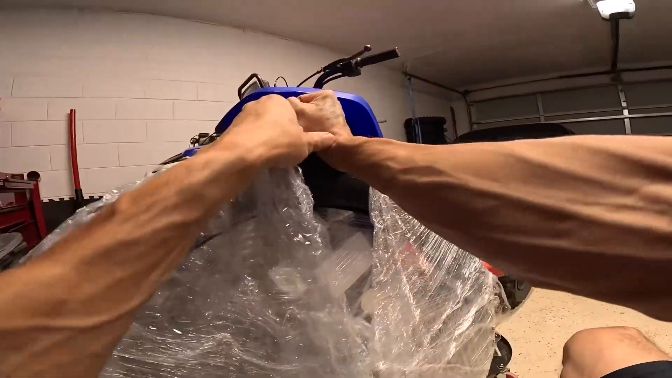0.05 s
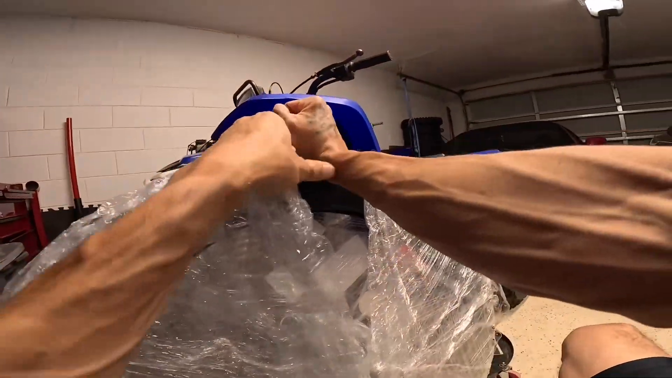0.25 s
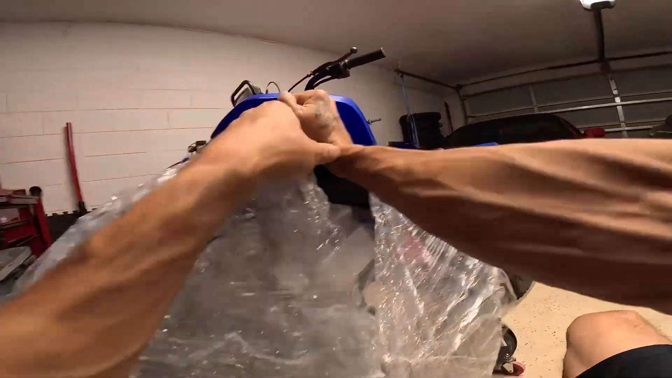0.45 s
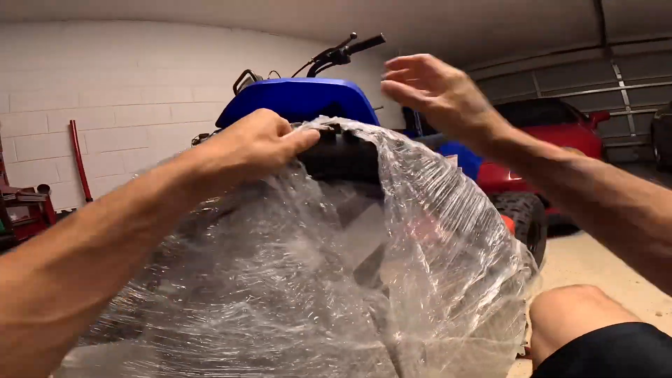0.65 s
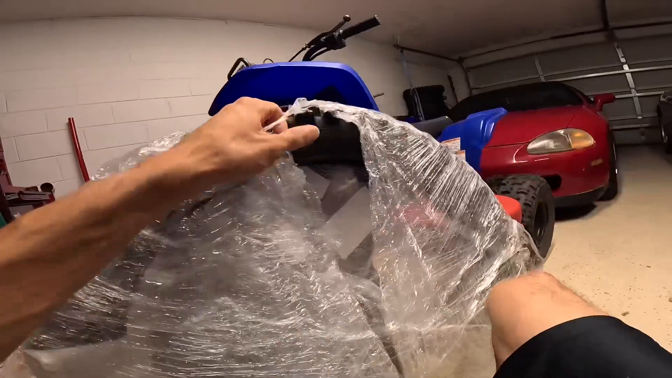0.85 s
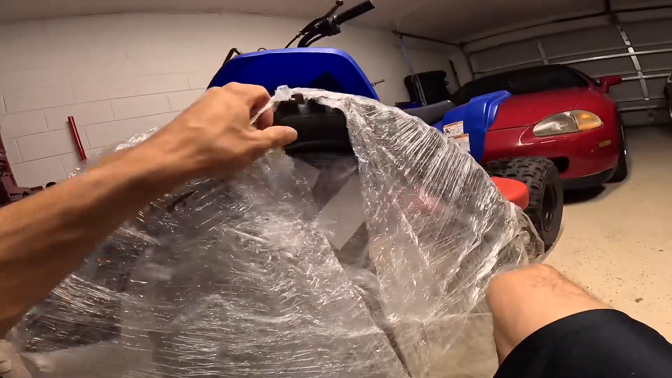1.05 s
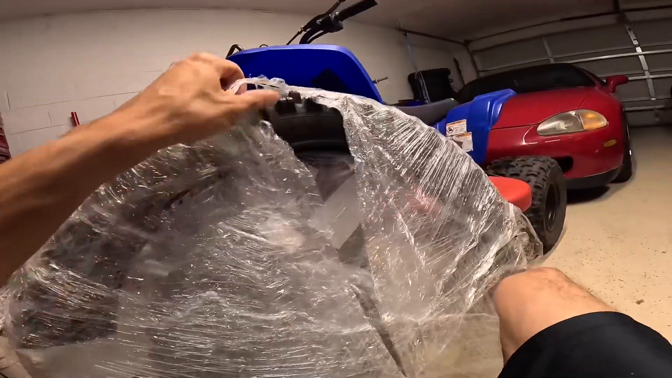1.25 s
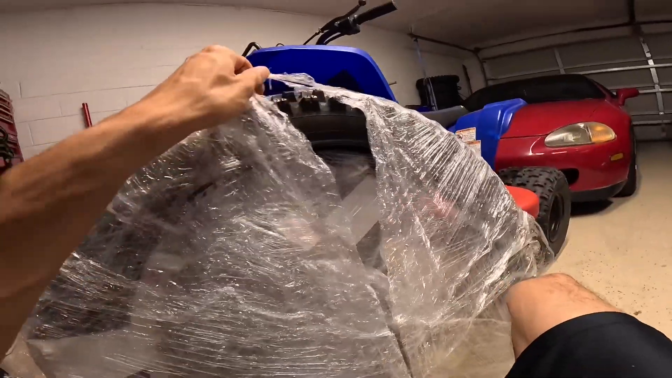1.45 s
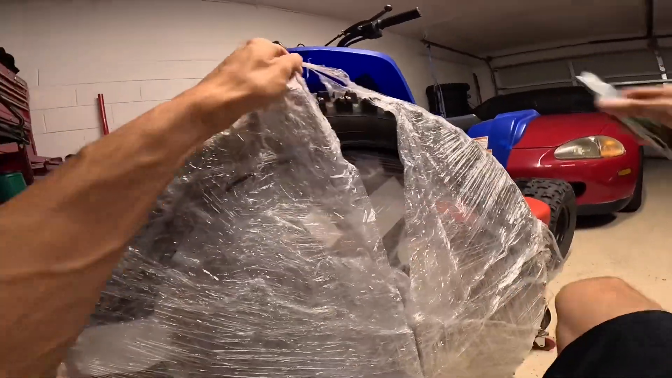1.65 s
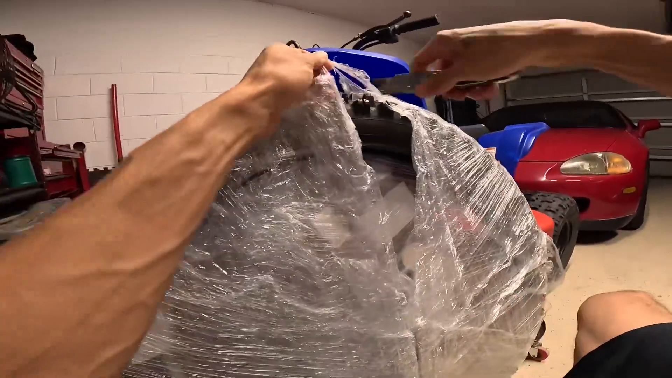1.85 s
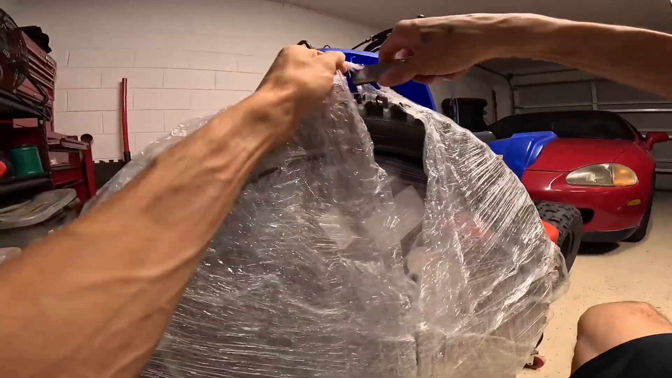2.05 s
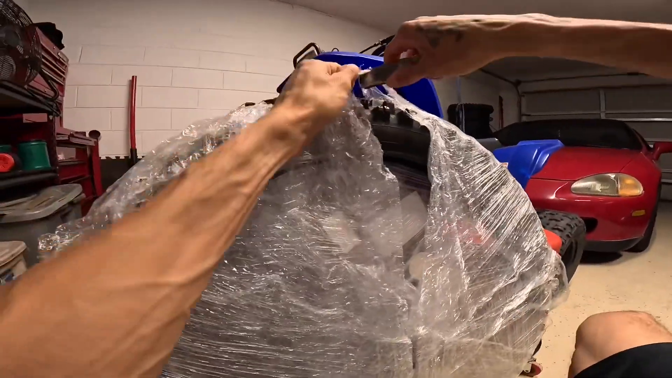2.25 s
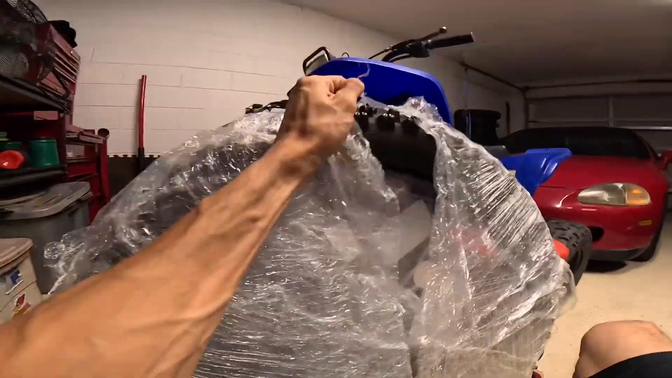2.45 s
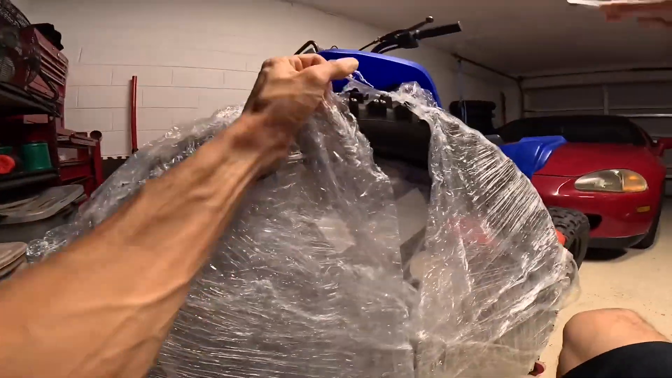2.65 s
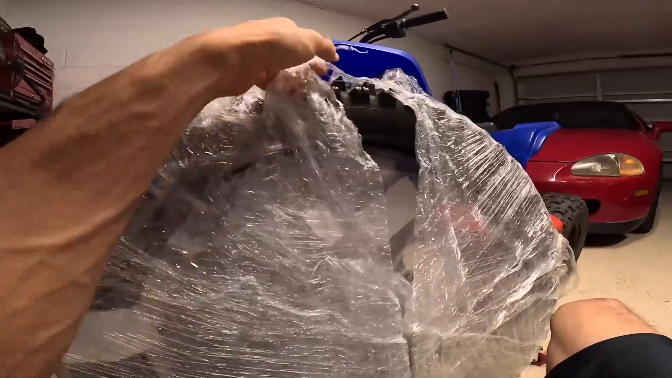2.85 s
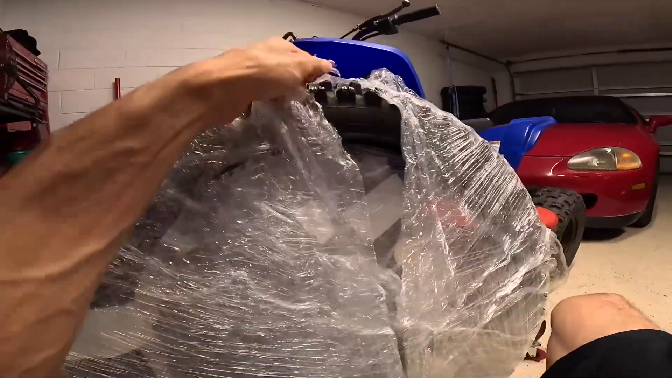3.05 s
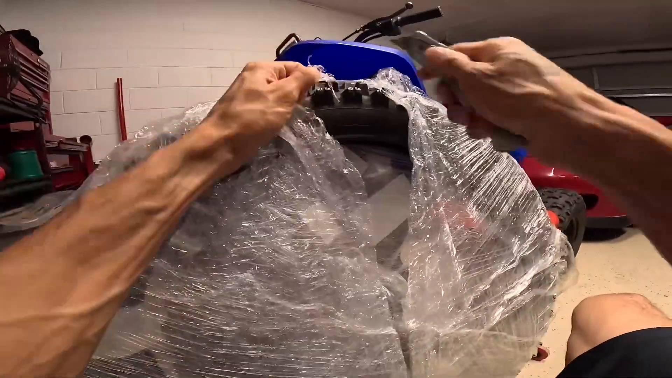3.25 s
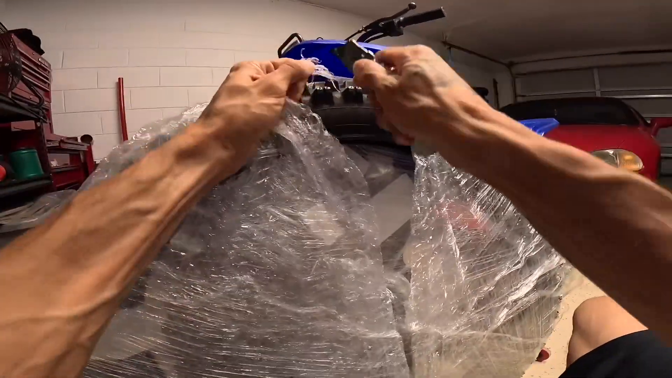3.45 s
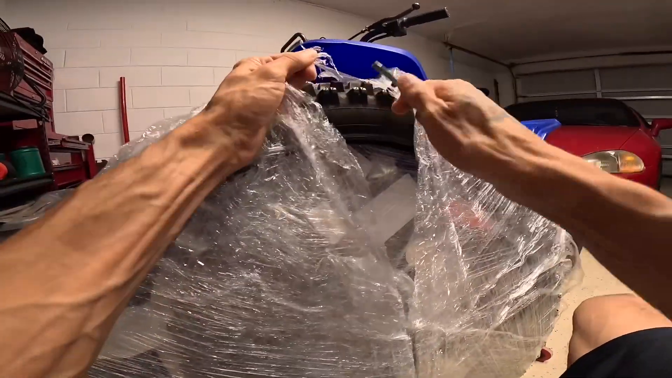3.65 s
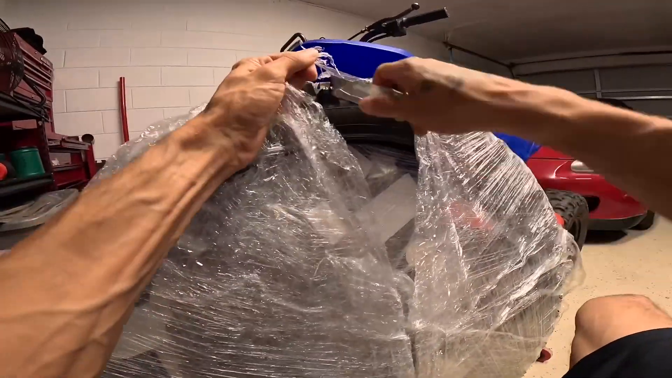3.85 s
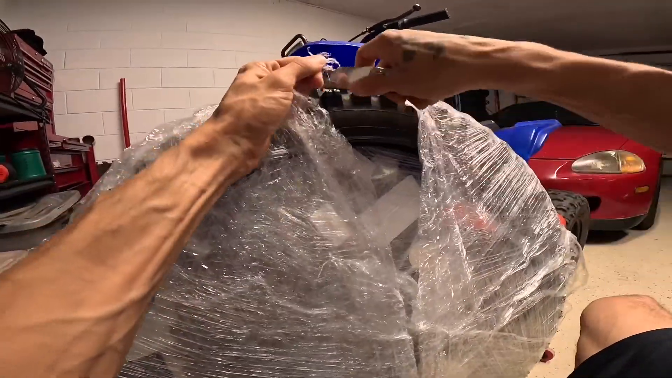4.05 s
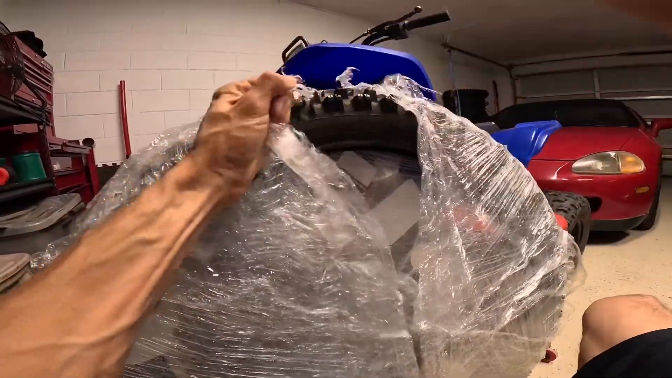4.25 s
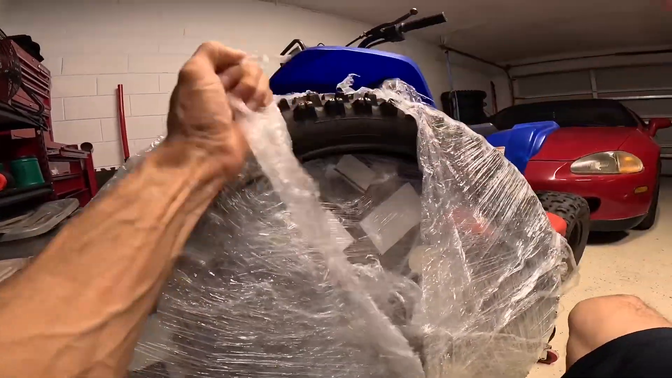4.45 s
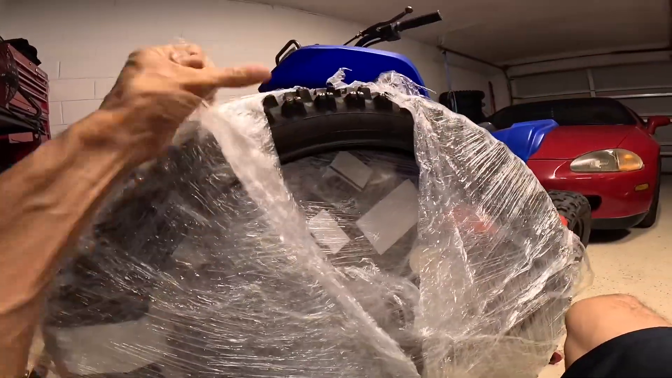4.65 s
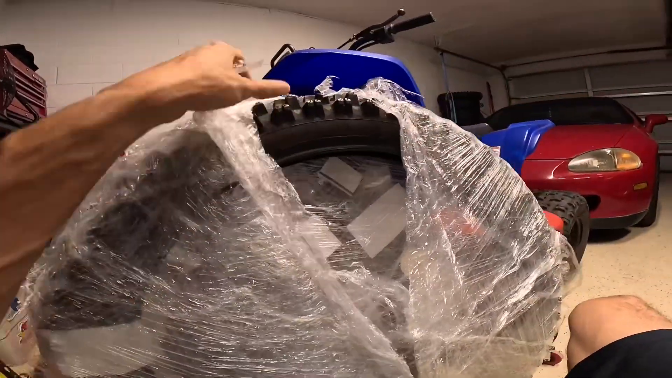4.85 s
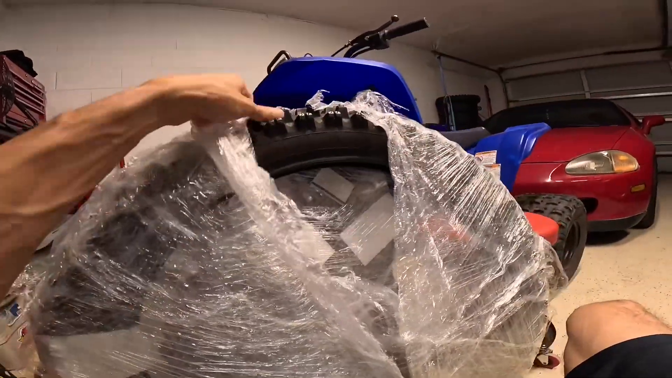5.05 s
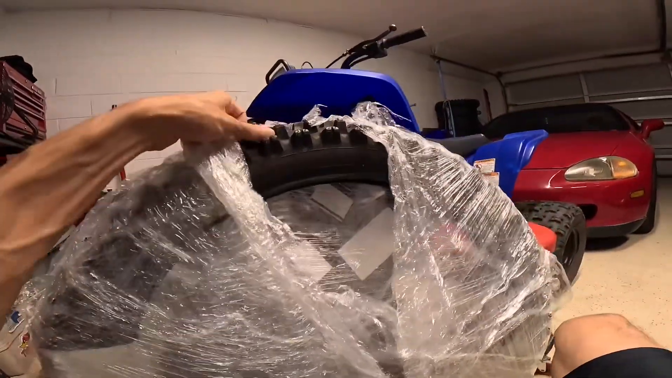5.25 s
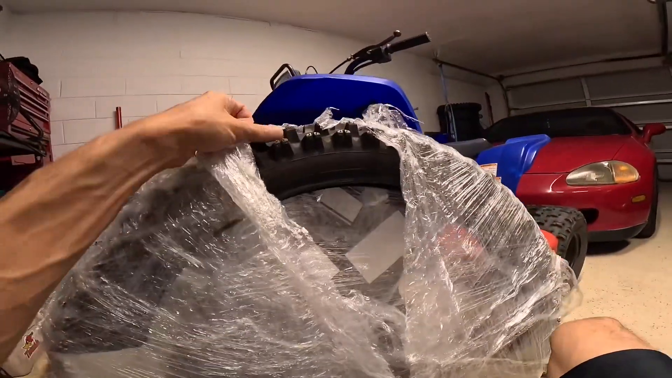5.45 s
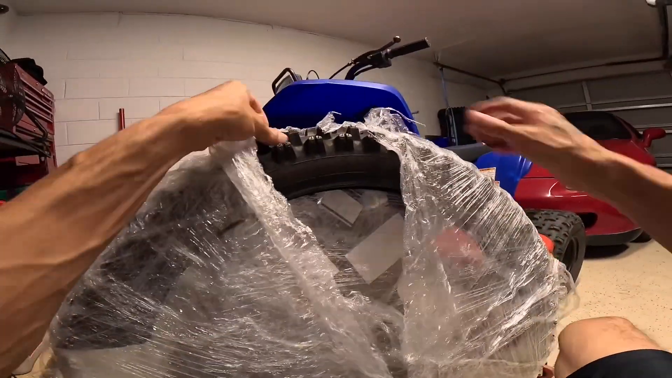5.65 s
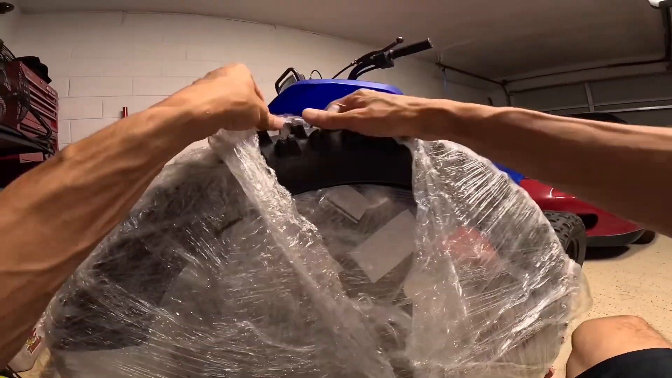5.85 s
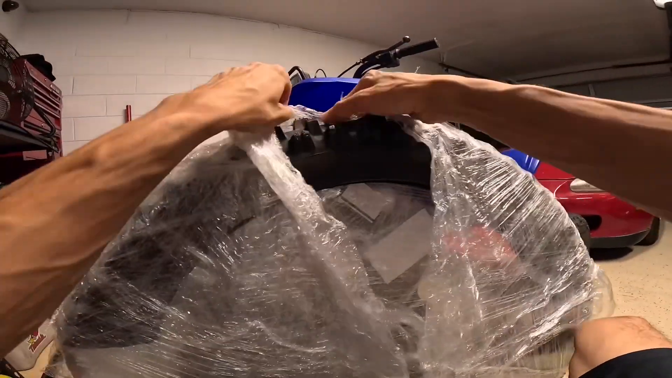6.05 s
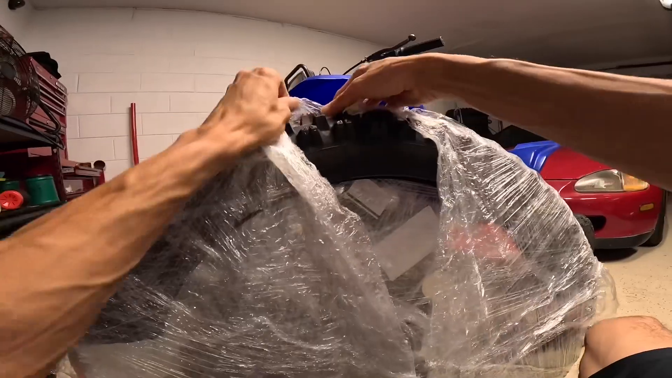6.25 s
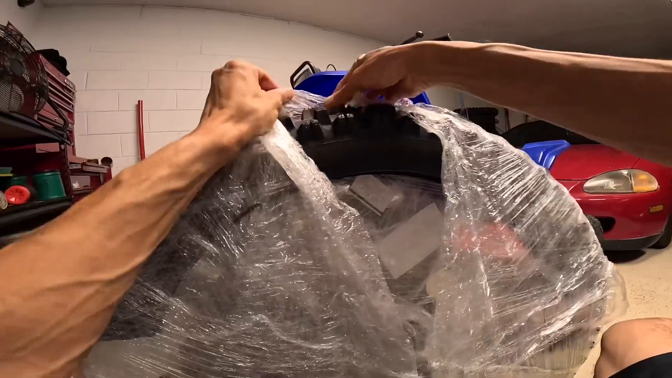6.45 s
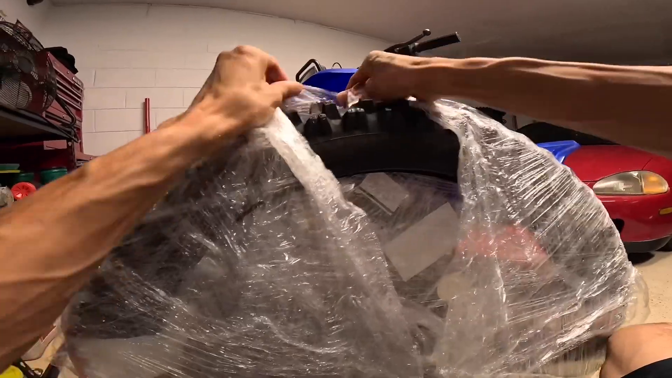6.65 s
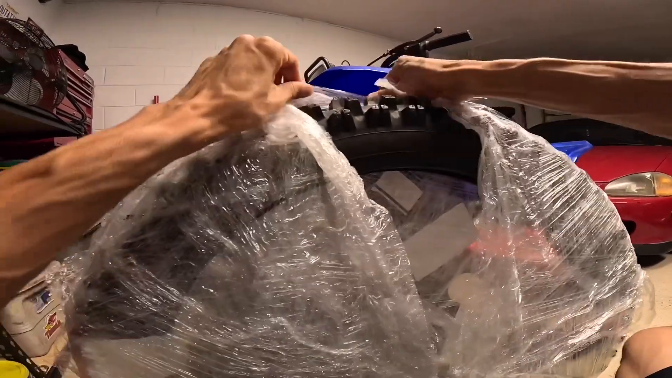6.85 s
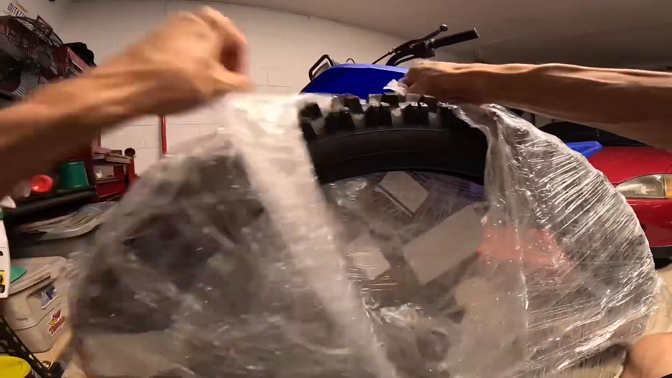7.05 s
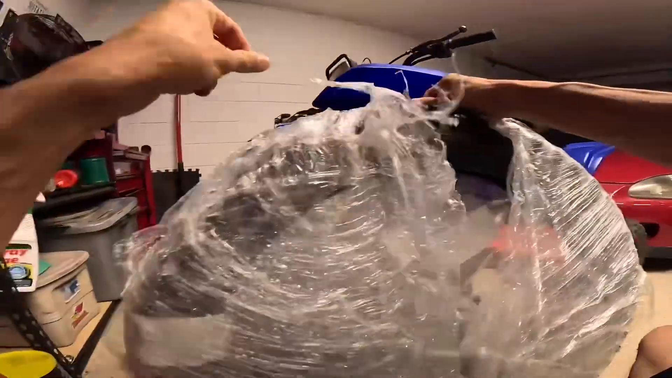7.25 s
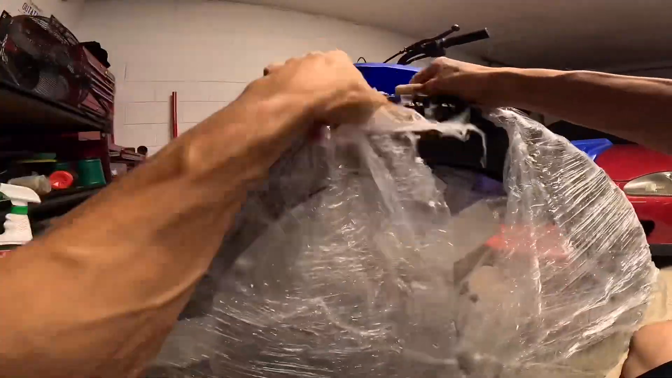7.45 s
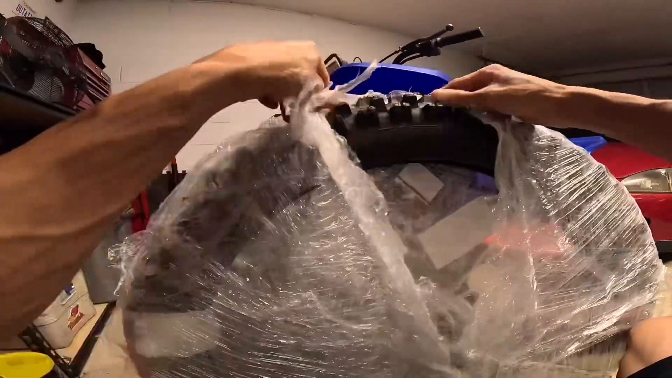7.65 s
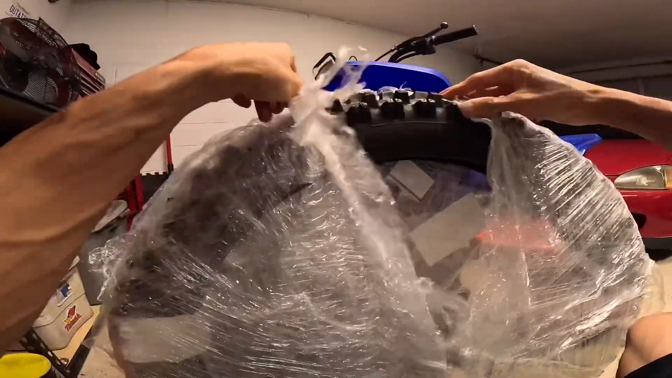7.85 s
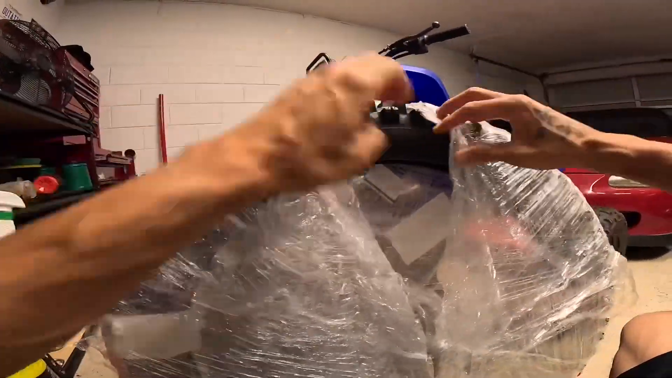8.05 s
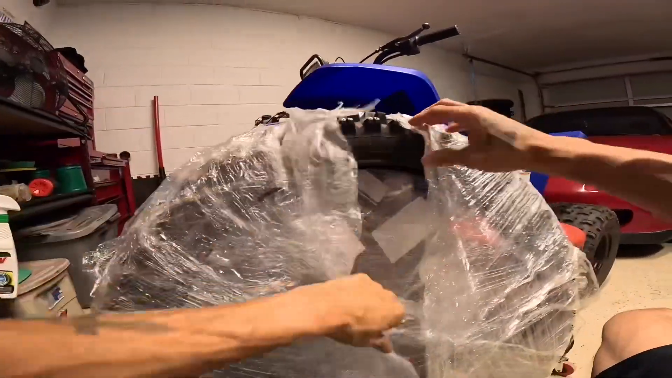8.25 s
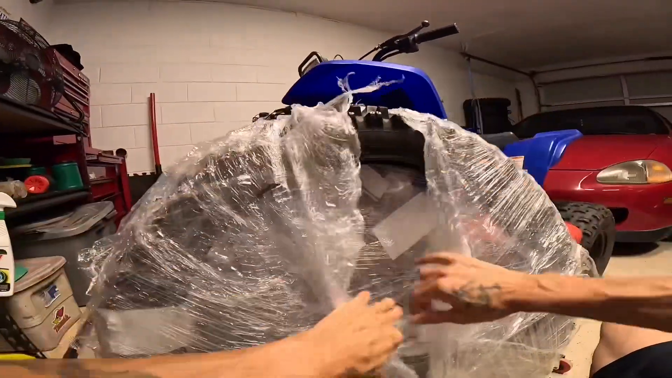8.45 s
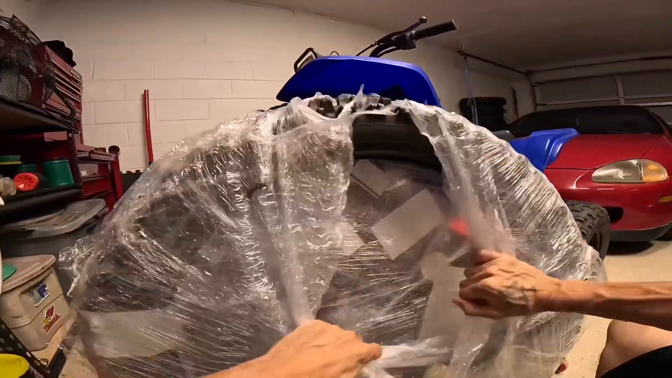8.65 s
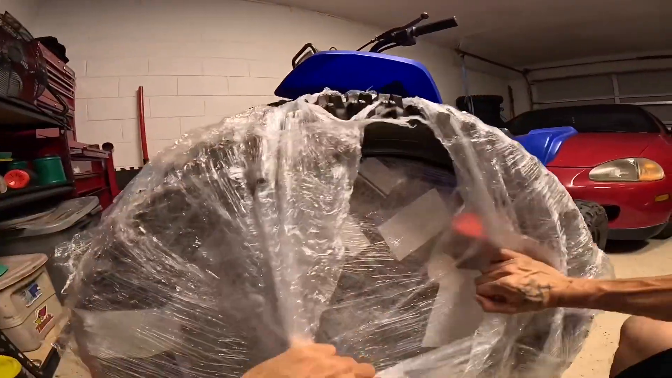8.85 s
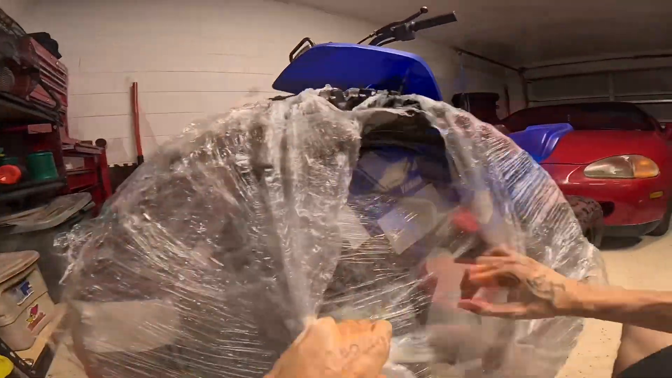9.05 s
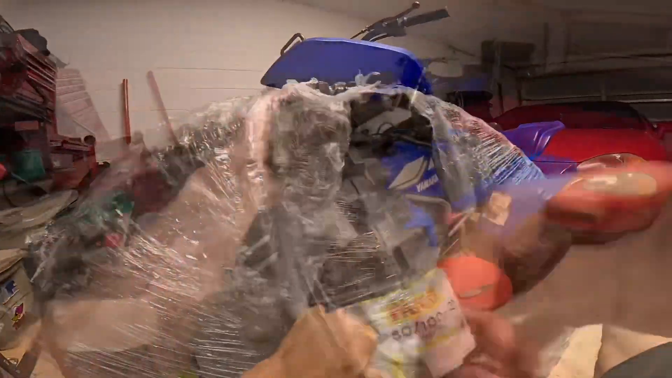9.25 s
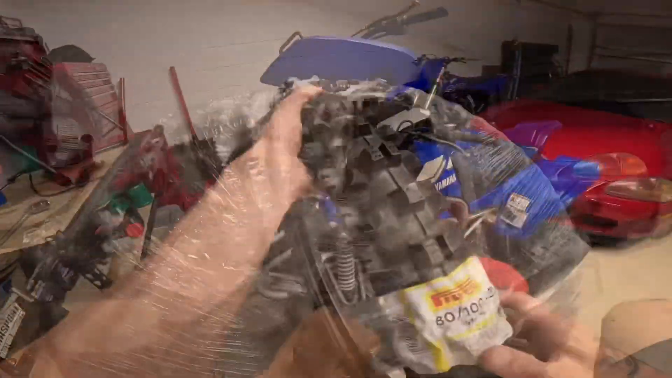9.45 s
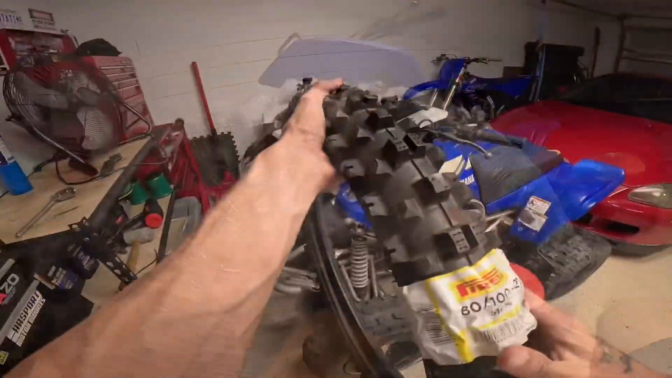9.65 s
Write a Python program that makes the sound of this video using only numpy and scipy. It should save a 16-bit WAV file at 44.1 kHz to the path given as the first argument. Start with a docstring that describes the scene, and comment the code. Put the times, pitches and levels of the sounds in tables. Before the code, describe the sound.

Close, uneven crinkling of plastic film being tugged and torn from a tire, with sharp snaps and dull flaps in a softly humming garage.

```python
"""Thin stretch film crackles as hands pull, cut and tear it off a tire, close to a small camera.
Creases let go with tiny ticks, taut film drums, loose film flaps and strands snap or squeak.
Behind it a motor hums, moving air rumbles and the hard garage walls echo.
At the end something soft bumps and the crackle fades."""
import sys
import numpy as np
from scipy import signal
from scipy.fft import rfft, irfft, next_fast_len
from scipy.io import wavfile
from scipy.ndimage import uniform_filter1d, map_coordinates

SR = 44100
rng = np.random.default_rng(int(sys.argv[2]) if len(sys.argv) > 2 else 0)


def bounce(signal):
    """Save signal as a 16-bit WAV file at the path given by the first command-line argument."""
    frames = np.transpose(np.atleast_2d(signal))
    limited = np.clip(frames, -1, 1)
    pcm = np.round(limited * 32767).astype(np.int16)
    wavfile.write(sys.argv[1], SR, pcm)


N = 427769

# the tone of crackling film: pitch_hz, level_db
CRACKLE_TONE = [(590, -40), (1000, -17), (1270, -10.5), (1820, -2.5), (2160, -0.5), (3710, -1), (4830, -5),
                (5360, -7), (6660, -8), (7740, -15.5), (8480, -14.5), (9960, -18), (12300, -23),
                (15600, -28)]
# how strong the fine treble is next to the crackle: time_s, level_db
FINE_TREBLE = [(0, -15), (.65, -15), (.88, -13), (1.25, -16), (1.7, -14), (2.1, -15), (2.4, -14),
               (2.52, -9), (2.7, -19), (2.92, -10), (3.1, -14), (3.72, -15.5), (3.83, -5), (3.95, -16),
               (4.45, -15), (4.65, -12.5), (5.2, -16), (6, -13.5), (6.9, -15.5), (7.5, -16), (7.92, -11),
               (8.1, -17.5), (8.5, -17), (8.6, -12), (8.85, -13.5), (9.2, -15.5), (9.7, -14)]


def film():
    """Creases let go in clumps: bright crackle over a rustle, and dull taps on loose and taut film."""
    # the tone of the dull taps: pitch_hz, level_db
    drum_tone = [(53, -34), (90, 0.5), (139, -5), (204, -1.5), (276, -2.5), (315, 1.5), (431, -3.5),
                 (758, -6), (815, -8), (1600, -11), (2080, -24), (3520, -120)]
    crackle_db, flap_db, drum_db = pull_levels()
    clumps = wobble(45)
    ticks = tiny_rings(count=40000, samples=96, low_hz=924, high_hz=16600, cycles=1.22, spread_db=2.5)
    crackle = with_tone(folds(ticks + 1.53 * rng.standard_normal(N), depth_db=2.0), CRACKLE_TONE)
    fine = filtered(crackle, lambda hz: hz > 7700)
    body = crackle - fine
    sheen = filtered(crackle, lambda hz: hz > 11500)
    # the top treble drops away when the crackle is quiet
    sheen_gain = amp(0.16 * (crackle_db + 60) + 2.3 * wobble(2.9))
    fine = fine + (sheen_gain - 1) * sheen
    jumps = creases(count=300, fade_s=0.022, spread_db=2.0)
    fine_db = curves(FINE_TREBLE)[0] + 0.071 * (crackle_db + 51) + 2.1 * wobble(9)
    fine_gain = amp(fine_db) * jumps ** 0.44  # the treble jumps further
    bright = amp(1.04 * clumps) * jumps * (unit(body) + fine_gain * unit(fine))
    taps = tiny_rings(count=6000, samples=800, low_hz=150, high_hz=1500, cycles=2.5, spread_db=1.3)
    dull_gain = amp(0.98 * clumps + 2.0 * wobble(30))
    dull = dull_gain * with_tone(taps + 2.16 * rng.standard_normal(N), drum_tone)
    flap = filtered(dull, lambda hz: 1 / (1 + (hz / 420) ** 8))
    return (amp(crackle_db) * unit(bright)
            + amp(flap_db + 1.8 * wobble(9.1)) * unit(flap)
            + amp(drum_db) * unit(dull - flap))


def pull_levels():
    """Tugs swell, sink and add up in power, giving the crackle, flap and drum levels in dB."""
    # each tug, cut or shift of the hands (rise and fall are the time for 10 dB):
    # peak_s, crackle_db, rise_s, fall_s, drum_above_crackle_db
    tugs = [(.06, -44, 0.43, 0.27, -9.5), (.23, -54, .1, .1, -14), (.371, -39.5, 0.095, 0.1, -6.5),
            (.5, -54, .1, .1, -6), (.605, -46, .02, .08, -8), (.655, -44, .03, .13, 3),
            (.85, -57.5, .1, .1, -2), (.954, -46, 0.09, 0.22, -7.5), (1.07, -54.5, .05, .1, -7),
            (1.17, -46, .012, 0.065, 3), (1.23, -52.5, .04, .1, -7), (1.31, -57, 0.11, 0.12, -12),
            (1.45, -53.5, 0.15, 0.14, -1.5), (1.7, -53, 0.79, 0.27, -14.5), (1.954, -59.5, .1, 0.036, -28),
            (2.195, -55.5, 0.078, 0.14, -15.5), (2.405, -31, 0.005, .06, -4.5),
            (2.459, -25, 0.033, 0.027, -4), (2.495, -38, 0.022, .1, 0), (2.674, -51.5, 0.075, 0.073, -8),
            (2.85, -54, 0.15, 0.23, -11), (2.93, -56.5, 0.064, .2, -8.5), (3.13, -62.5, .1, .1, -8),
            (3.279, -51.5, 0.18, 0.076, -15.5), (3.592, -55.5, 0.18, 0.052, -17),
            (3.684, -55.5, .05, 0.038, -11.5), (3.829, -60.5, 0.16, 0.099, -20),
            (3.989, -64, 0.035, 0.066, -7), (4.17, -58, 0.029, .05, -19), (4.225, -43.5, 0.023, 0.033, -20),
            (4.245, -32, 0.0064, 0.094, 1), (4.5, -50.5, .15, .2, -6), (4.667, -47, 0.24, .1, -10),
            (4.719, -45, .04, .04, -18), (4.909, -55.5, 0.27, 0.23, -13), (5.135, -45, .04, 0.11, -18.5),
            (5.21, -52, .05, 0.086, -12), (5.339, -37, .012, 0.075, -22), (5.46, -52, .1, 0.11, -17),
            (5.567, -46, 0.12, 0.038, -11.5), (5.679, -47.5, .12, 0.13, -10), (5.87, -51.5, .08, 0.07, -22),
            (5.944, -49, 0.015, 0.044, 6.5), (6.011, -45, 0.13, 0.09, -7),
            (6.14, -44.5, 0.052, 0.062, -9.5), (6.296, -47, 0.095, 0.039, -10.5),
            (6.441, -46, 0.31, 0.078, -11), (6.545, -44.5, 0.07, 0.38, -12),
            (6.695, -35.5, 0.039, 0.047, -4), (6.799, -34, 0.073, 0.1, -3), (6.936, -33, 0.06, 0.033, 0.5),
            (7.058, -41.5, 0.21, 0.045, -3), (7.112, -28.5, 0.018, 0.097, -2),
            (7.174, -30, 0.065, 0.028, -5), (7.3, -51, 0.065, 0.13, 8), (7.549, -46.5, 0.068, 0.071, -3.5),
            (7.625, -41.5, 0.024, 0.057, -4), (7.78, -46.5, .3, 0.082, -8),
            (7.922, -45.5, 0.073, 0.084, -13), (8.06, -45, 0.14, 0.065, -9), (8.27, -39, 0.026, 0.38, -2),
            (8.36, -39, 0.061, 0.14, 1.5), (8.461, -37, .08, 0.047, 3), (8.61, -31, 0.053, 0.071, -0.5),
            (8.75, -40, 0.15, 0.28, -1.5), (8.903, -31.5, .16, 0.047, 2), (9, -39.5, 0.089, 0.12, -0.5),
            (9.081, -41.5, 0.1, 0.092, 1), (9.25, -55, .1, 0.15, -22), (9.42, -63, .08, .14, -5),
            (9.65, -72, 0.11, 0.18, -3)]
    # how loose the sheet hangs: time_s, flap_above_drum_db
    looseness = [(0, -10), (.3, -3), (.95, -2.5), (1.4, -1), (2.2, 3.5), (2.6, -4.5), (3.3, -0.5),
                 (4.2, 1.5), (4.5, -2.5), (5.3, -1), (6.1, -1), (6.5, -14.5), (7, -12), (7.15, -1),
                 (7.5, 3), (8, -5.5), (8.5, -5), (9.1, -3), (9.7, -14)]
    rest_crackle_db, rest_drum_db = -76, -86  # the film settling by itself
    peak_s, db, rise_s, fall_s, drum_above_db = np.transpose(tugs)[:, :, None]
    t = np.linspace(0, N / SR, num=3300)
    power = amp(db - 10 * np.maximum((peak_s - t) / rise_s, (t - peak_s) / fall_s)) ** 2
    crackle_db = 10 * np.log10(power.sum(0) + amp(rest_crackle_db) ** 2)
    drum_db = 10 * np.log10((power * amp(drum_above_db) ** 2).sum(0) + amp(rest_drum_db) ** 2)
    crackle_db, drum_db = curves(np.transpose([t, crackle_db, drum_db]))
    return crackle_db, drum_db + curves(looseness)[0], drum_db


def creases(count, fade_s, spread_db):
    """A gain that jumps when a crease lets go and quickly sinks back."""
    draw, t = rng.random((count, 2)), np.arange(SR // 20) / SR
    strength = amp(-spread_db * np.log(1.01 - draw[:, 1]))
    kicks = np.bincount((draw[:, 0] * N).astype(int), strength, N)
    power = signal.fftconvolve(kicks ** 2, amp(-120 * t / fade_s))[:N]
    return np.sqrt(1 + power.clip(0))


def folds(x, depth_db):
    """Each fold has its own tone: random patches of time and pitch get louder or softer."""
    spectrum = signal.stft(x, nperseg=256)[2]
    patches = uniform_filter1d(rng.standard_normal(spectrum.shape), size=4, axis=0)
    patches = uniform_filter1d(patches, size=9, axis=1)
    return signal.istft(spectrum * amp(depth_db * unit(patches)), nperseg=256)[1][:N]


def tiny_rings(count, samples, low_hz, high_hz, cycles, spread_db):
    """Ticks or taps: short dying tones at random times and pitches, some louder than the rest."""
    draw, t = rng.random((count, 4)), np.arange(samples) / SR
    hz = low_hz * (high_hz / low_hz) ** draw[:, 1:2]
    strength = amp(-spread_db * np.log(1.004 - draw[:, 2:3])) * np.sign(draw[:, 3:] - .5)
    # high tones die sooner, so they start stronger
    rings = strength * hz * np.exp(-t * hz / cycles) * np.sin(2 * np.pi * hz * t)
    places = (draw[:, :1] * N).astype(int) + np.arange(samples)
    return unit(np.bincount(places.ravel(), rings.ravel(), N + samples)[:N])


def snaps():
    """A strand breaks with a click and a burst of crackle; the freed sheet swings like a drum skin."""
    # breaks and knocks on taut film: start_s, click_db, click_hz, drum_offset_db, drum_hz
    breaks = [(0.3704, -27.5, 1960, -5, 295), (0.5934, -20.5, 2540, -35, 253), (0.623, -28, 3200, -10, 418),
              (0.662, -35.5, 2790, 9, 256), (.9398, -23, 2650, -16.5, 620), (1.064, -24.5, 2800, -28, 337),
              (1.158, -31.5, 2580, 1.5, 314), (1.198, -31, 1620, -20, 256), (1.3783, -39, 1730, -12, 385),
              (1.4287, -42, 1580, -10, 423), (1.718, -36.5, 4100, -11, 300), (1.749, -38, 3200, -16, 242),
              (2.4059, -13, 2920, -7, 290), (2.4412, -16, 4660, -10, 260), (2.4624, -12.5, 1740, -3.5, 434),
              (2.8165, -34, 3340, -29, 310), (3.11, -38, 2900, -10, 324), (3.1956, -32, 3340, -34, 207),
              (3.3786, -36, 3380, -39, 207), (3.65, -39.5, 3330, -8.5, 430), (3.828, -43, 3730, -29, 215),
              (3.992, -46.5, 4060, -12, 458), (4.0694, -54, 1800, -2, 450), (4.117, -43, 5570, -24, 202),
              (4.2132, -21.5, 2750, -34, 403), (4.2426, -9, 2000, -10, 413), (4.2472, -9.5, 2240, -1, 315),
              (4.2485, -15, 1150, -12, 190), (4.6648, -28.5, 2310, -21, 447), (4.715, -31, 2400, -21, 390),
              (5.1453, -24, 2840, -25, 403), (5.3301, -26, 3320, -30.5, 317),
              (5.4938, -31.5, 1770, -16, 423), (5.5653, -31, 2640, -15, 696),
              (5.623, -28.5, 3740, -29, 202), (5.652, -29, 3350, -25, 387), (5.7084, -39, 2730, -6, 387),
              (5.744, -27.5, 3740, -31, 630), (5.8114, -29, 3160, -33, 396),
              (5.9345, -25.5, 2300, 4.5, 298), (6.1137, -27, 2230, -19, 204),
              (6.1241, -27.5, 2220, -6, 267), (6.1492, -28, 3050, -0.5, 212), (6.6755, -27, 4430, -11, 584),
              (6.7014, -30, 3500, 4, 665), (6.7429, -27, 2140, -2.5, 478), (6.8187, -17.5, 1840, -25, 640),
              (6.9246, -10, 3700, -6.5, 504), (7.003, -26, 3000, -15, 423), (7.0938, -22, 3260, -12, 363),
              (7.1073, -21, 3030, -1.5, 372), (7.1221, -11.5, 3060, 6.5, 275),
              (7.1681, -17.5, 4500, -8, 556), (7.512, -33, 3100, -8, 412), (7.544, -34, 2810, -7, 206),
              (7.6176, -40, 2200, -4, 392), (7.8358, -33, 4370, -26, 462), (7.92, -34, 2040, -6.5, 358),
              (8.356, -34, 2420, -9, 346), (8.412, -23, 2300, -10, 358), (8.5825, -21.5, 2860, -5, 395),
              (8.6207, -25, 2530, 1, 506), (8.9912, -26, 3460, -3, 378), (9.0607, -28, 2820, 4, 420),
              (9.0848, -25.5, 2170, 0.5, 580), (9.1224, -31.5, 2040, -2.5, 690),
              (9.3222, -36, 3650, -3, 584), (9.3567, -25.5, 1760, 10, 240), (9.4978, -47, 4090, -16, 202),
              (9.652, -48, 3100, -16, 202)]
    click_cycles, burst_fade_s, fine_fade_s = 17.8, 0.019, 0.02  # each to fall by 60 dB
    rings, burst_gain, fine_gain = np.zeros((3, N + SR))
    t = np.arange(SR // 10) / SR
    noise = with_tone(rng.standard_normal(N), CRACKLE_TONE)
    body = unit(filtered(noise, lambda hz: hz < 6000))
    fine = unit(filtered(noise, lambda hz: hz > 6000))
    bent_time = t + 0.0011 * (1 - np.exp(-t / 0.00063))  # tension and pitch fall in the first swing
    for start_s, db, click_hz, drum_db, drum_hz in breaks:
        click_gain = amp(db - 60 * t * click_hz / click_cycles) * (1 - np.exp(-t * click_hz / 0.85))
        add(rings, start_s, click_gain * np.sin(2 * np.pi * click_hz * t))
        burst_db = db - 0.66 * max(drum_db, 0)  # a heavy knock crackles less
        fine_db = burst_db + np.interp(start_s, *np.transpose(FINE_TREBLE))
        add(burst_gain, start_s, amp(burst_db - 10.5 - 60 * t / burst_fade_s))
        add(fine_gain, start_s, amp(fine_db - 8 - 60 * t / fine_fade_s))
        drum_fade_s = 0.024 + .0008 * max(-30 - db, 0)  # a gentle knock rings longer
        drum_gain = amp(db + drum_db + 7.5 - 60 * t / drum_fade_s) * (1 - np.exp(-t / 0.0017))
        phase = 2 * np.pi * drum_hz * bent_time
        overtone = 0.66 * amp(-60 * t / 0.021) * np.sin(2.29 * phase)
        add(rings, start_s, -drum_gain * (np.sin(phase) + overtone))
    return rings[:N] + burst_gain[:N] * body + fine_gain[:N] * fine


def squeaks():
    """A strand slips, and its pitch falls as it slackens."""
    # slipping strands: start_s, level_db, start_hz, end_hz, length_s, lateness (above 1 peaks late)
    slips = [(7.112, -16.5, 810, 464, 0.015, 1.6), (7.343, -26.5, 1246, 620, 0.013, 0.52),
             (7.351, -31, 700, 630, 0.024, 0.7), (7.357, -34, 1200, 1070, 0.017, 0.7),
             (7.362, -30, 450, 370, 0.022, 0.8)]
    track = np.zeros(N)
    for start_s, db, start_hz, end_hz, length_s, lateness in slips:
        progress = np.linspace(0, 1, round(length_s * SR))
        phase = 2 * np.pi * np.cumsum(start_hz * (end_hz / start_hz) ** progress) / SR
        add(track, start_s, amp(db) * np.sin(np.pi * progress ** lateness) * np.sin(phase))
    return track


def bumps():
    """Soft contacts: a low tone builds up, then dies."""
    # bumps and puffs of air from the flapping sheet: start_s, level_db, pitch_hz, rise_s, fade_s
    contacts = [(2.461, -18, 172, .004, 0.036), (2.467, -29, 90, 0.0059, 0.093),
                (4.248, -17, 190, 0.0028, 0.038), (4.256, -28, 90, 0.012, 0.088),
                (7.124, -16, 150, 0.0043, 0.062), (7.131, -23, 95, 0.0054, 0.079),
                (7.164, -28, 93.5, 0.0065, 0.087), (7.176, -20, 45, .015, 0.1),
                (8.999, -24, 70, 0.0031, 0.038), (9.330, -11.5, 139.8, 0.034, 0.039),
                (9.360, -13, 108.5, 0.0042, 0.076), (9.369, -15, 165, 0.0025, .06),
                (9.394, -16.5, 55.7, 0.0082, 0.032), (9.434, -20.5, 40.2, 0.011, 0.036)]
    track, t = np.zeros(N + SR), np.arange(SR // 2) / SR
    for start_s, db, hz, rise_s, fade_s in contacts:
        swell = np.minimum(t / rise_s, 1) ** 2 * amp(-60 * np.maximum(t - rise_s, 0) / fade_s)
        add(track, start_s, -amp(db) * swell * np.sin(2 * np.pi * hz * t))
    return track[:N]


def motor_and_air():
    """A motor hums unsteadily, moving air rumbles, and a low drone swells when the sheet flaps."""
    # the motor's two notes: pitch_hz, level_db
    hum_notes = [(59.2, -0.5), (118.4, -19.5)]
    # the hum, dipping briefly near the end: time_s, level_db
    motor_level = [(0, -45), (4, -46.5), (8.9, -47.5), (9.3, -56), (9.7, -48)]
    # air moving past the microphones: time_s, level_db
    gusts = [(0.0, -51.5), (2.27, -54), (2.48, -39.5), (2.81, -49.5), (4.02, -57), (4.32, -40.5),
             (4.46, -52), (5.65, -49.5), (6.81, -41), (6.91, -48), (7.19, -29.5), (7.27, -44.5),
             (8.24, -46.5), (8.37, -33), (8.45, -48), (8.64, -33), (8.73, -47), (9.1, -40), (9.32, -52),
             (9.4, -43.5), (9.59, -62), (9.7, -55)]
    # the tones of the rumble and the drone: pitch_hz, level_db
    rumble_tone = [(6, -27), (12, 10), (30, 12.5), (48, 7), (60, -38)]
    drone_tone = [(55, -37), (70, -1.5), (100, -9), (140, -13), (180, -18.5), (260, -31), (900, -63),
                  (1500, -57)]
    motor_db, flap_db = curves(motor_level)[0], pull_levels()[1]
    turn = 2 * np.pi * np.arange(N) / SR
    hum = sum(amp(db + 2.4 * wobble(17)) * np.sin(hz * turn + 0.57 * wobble(5)) for hz, db in hum_notes)
    rumble = amp(curves(gusts)[0] + 2.4 * wobble(6)) * with_tone(rng.standard_normal(N), rumble_tone)
    drone_gain = np.hypot(amp(motor_db - 13.5), amp(flap_db - 6.5))
    drone = drone_gain * with_tone(rng.standard_normal(N), drone_tone)
    return amp(motor_db) * unit(hum) + rumble + drone


def wall_echo(x):
    """The hard walls answer a moment later, and each pitch dies at its own speed."""
    # how long the echo takes to fall by 60 dB: pitch_hz, fade_s
    fade_times = [(100, 0.27), (500, 0.24), (3000, 0.53), (12000, 0.66)]
    hz, t, noise = signal.stft(rng.standard_normal(SR), SR, nperseg=256)
    tail = signal.istft(noise * amp(-60 * t / at_pitch(fade_times, hz)[:, None]), SR, nperseg=256)[1]
    return signal.fftconvolve(np.pad(x, (300, 0)), tail / np.linalg.norm(tail))[:N]


def amp(db):
    """Turn decibels into a gain."""
    return 10 ** (np.asarray(db) / 20)


def unit(x):
    """Scale x to an average power of 1."""
    return x / np.sqrt(np.mean(x ** 2) + 1e-20)


def at_pitch(points, hz):
    """Read between (pitch_hz, value) points on a log pitch scale."""
    pitches, values = np.transpose(points)
    return np.interp(np.log(hz + 1), np.log(pitches + 1), values)


def curves(rows):
    """One value per sample for each column after the time."""
    times, *columns = np.transpose(rows)
    return [np.interp(np.arange(N) / SR, times, column) for column in columns]


def wobble(rate):
    """A smooth curve through `rate` random points a second."""
    return map_coordinates(rng.standard_normal(int(N * rate / SR) + 4), [np.arange(N) * rate / SR])


def filtered(x, gain_at):
    """Scale each frequency in x by gain_at(hz)."""
    size = next_fast_len(N + SR // 2)
    return irfft(rfft(x, size) * gain_at(np.fft.rfftfreq(size, 1 / SR)), size)[..., :N]


def with_tone(x, tone):
    """Shape x with a tone table, at an average power of 1."""
    return unit(filtered(x, lambda hz: amp(at_pitch(tone, hz))))


def add(track, start_s, sound):
    """Lay a sound on the track."""
    track[round(start_s * SR):][:len(sound)] += sound


def scene():
    """Both microphones hear the same mix, except in the highest treble."""
    # sound that left and right do not share: pitch_hz, above_shared_db
    width = [(8000, -84), (10000, -42), (11200, -6), (15000, 7.5)]
    # the top treble leans left: pitch_hz, left_above_right_db
    lean = [(10000, 0), (11500, 1), (15000, 7)]
    hits, sheet = snaps() + squeaks(), film()
    echo = amp(-11.5) * wall_echo(hits) + amp(-13) * wall_echo(sheet)
    shared = hits + sheet + echo + bumps() + motor_and_air()
    spectrum = signal.stft(shared, nperseg=128)[2]
    random_phases = np.exp(2j * np.pi * rng.random(spectrum.shape))
    scrambled = signal.istft(spectrum * random_phases, nperseg=128)[1][:N]
    side = filtered(scrambled, lambda hz: amp(at_pitch(width, hz)))
    pair = np.array([shared + side, shared - side])
    return filtered(pair, lambda hz: amp(at_pitch(lean, hz) * [[.5], [-.5]])
                    / np.hypot(1, amp(at_pitch(width, hz))))  # offsets the power the side adds


def record(dry):
    """The camera keeps nothing above its highest pitch."""
    top_hz = 15750
    return filtered(dry, lambda hz: hz < top_hz)


dry = scene()
out = record(dry)
bounce(out)
```